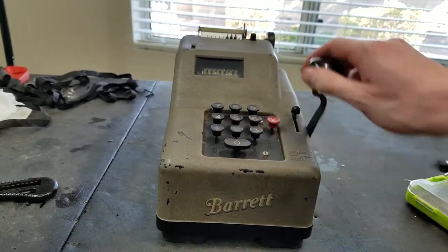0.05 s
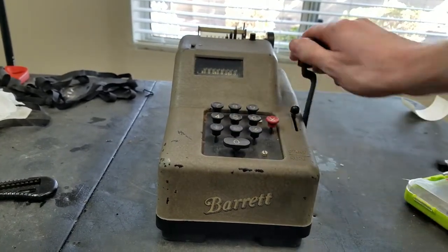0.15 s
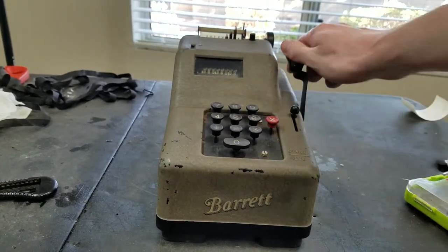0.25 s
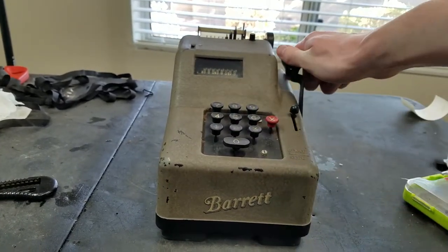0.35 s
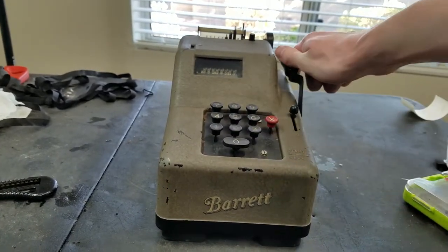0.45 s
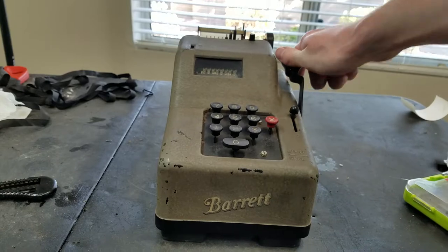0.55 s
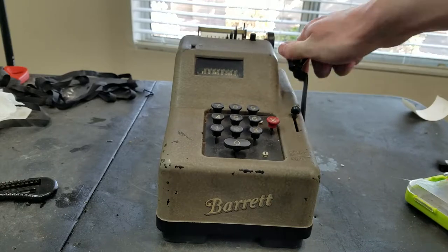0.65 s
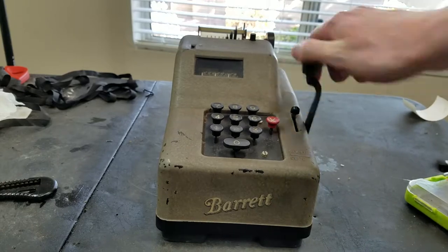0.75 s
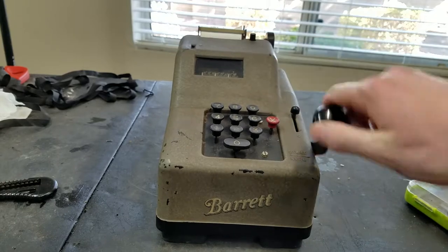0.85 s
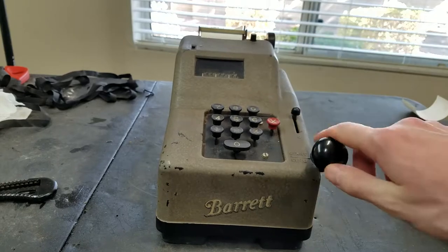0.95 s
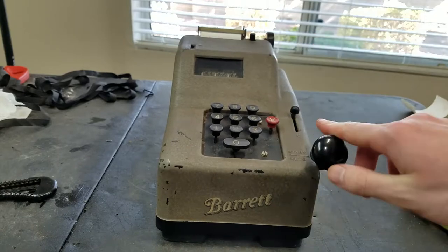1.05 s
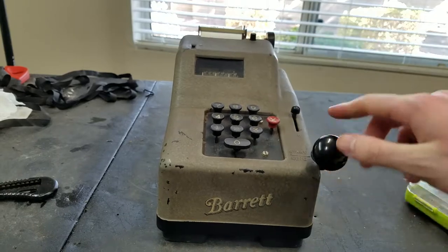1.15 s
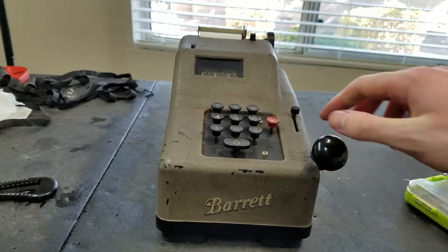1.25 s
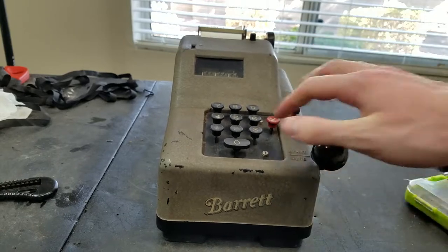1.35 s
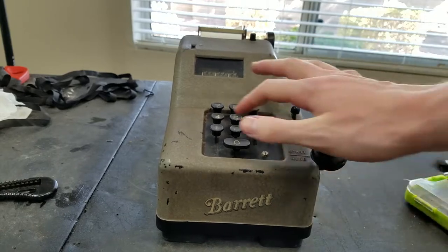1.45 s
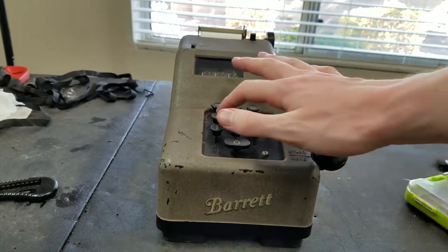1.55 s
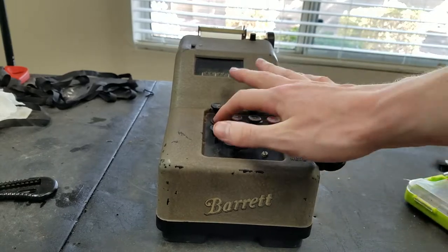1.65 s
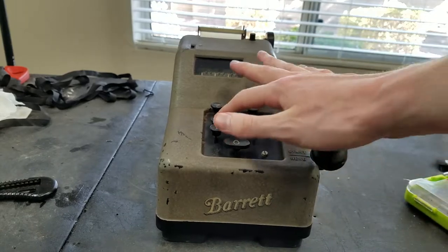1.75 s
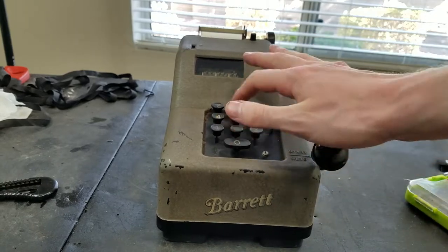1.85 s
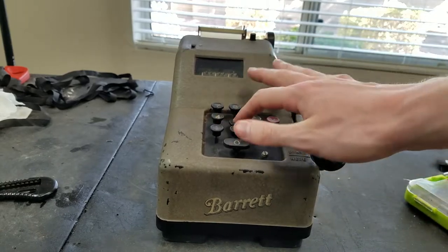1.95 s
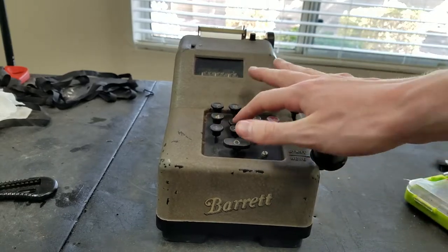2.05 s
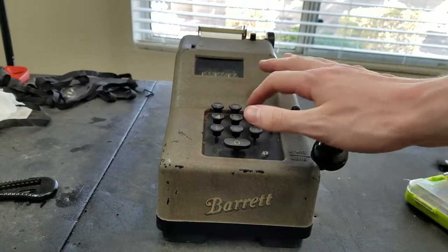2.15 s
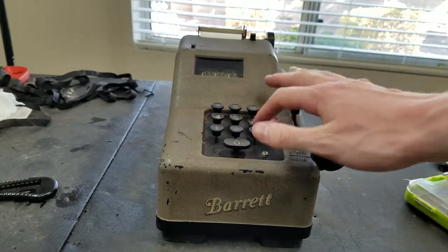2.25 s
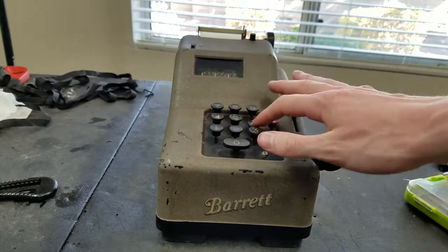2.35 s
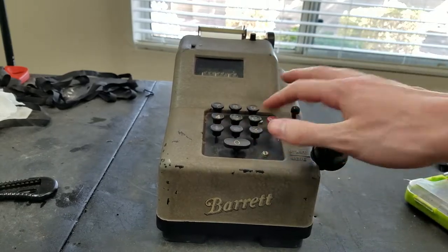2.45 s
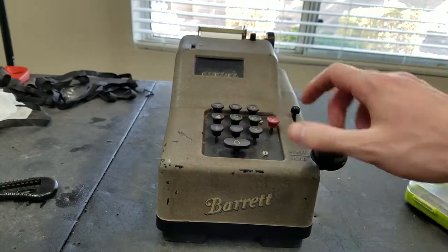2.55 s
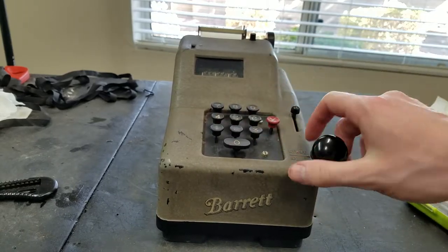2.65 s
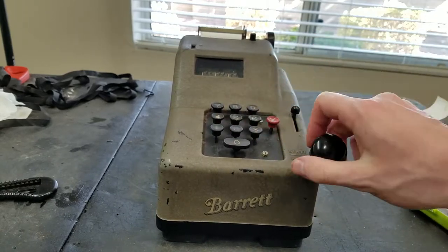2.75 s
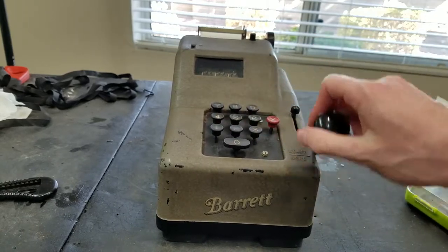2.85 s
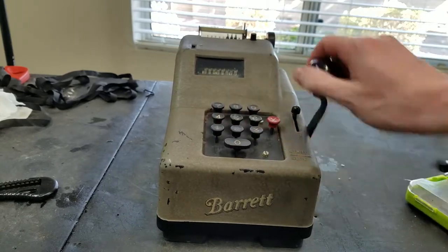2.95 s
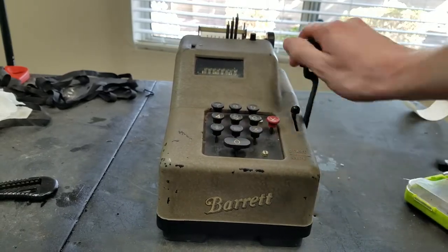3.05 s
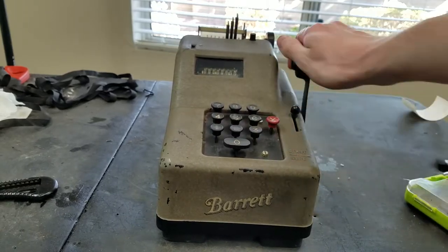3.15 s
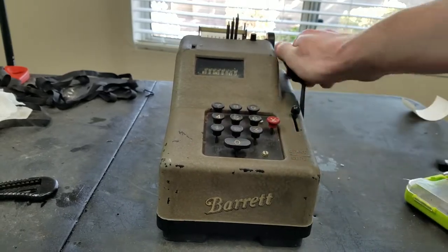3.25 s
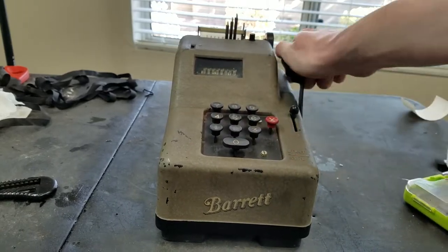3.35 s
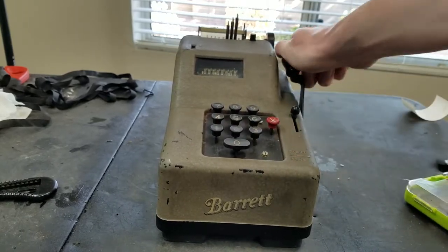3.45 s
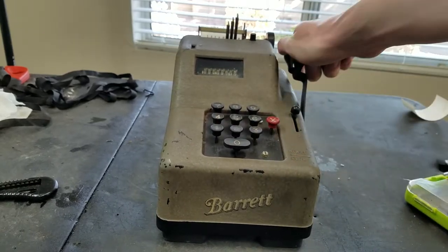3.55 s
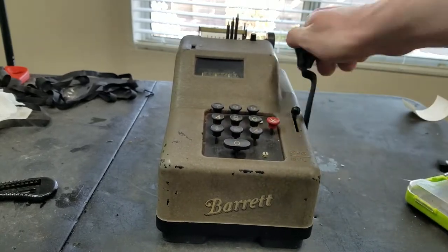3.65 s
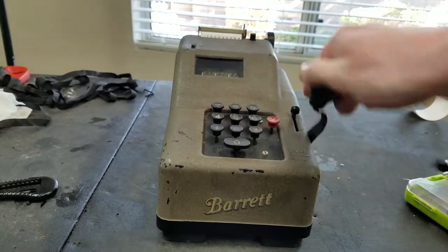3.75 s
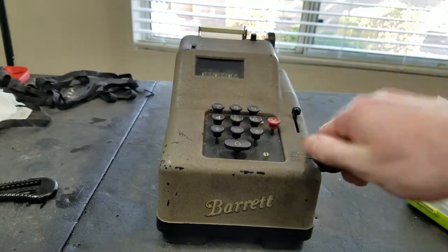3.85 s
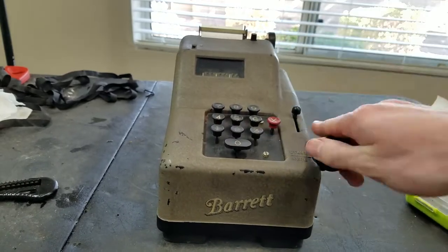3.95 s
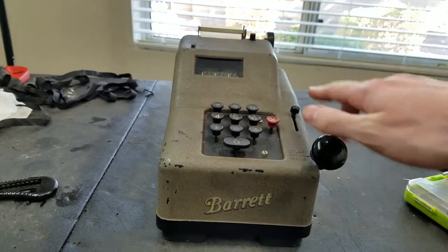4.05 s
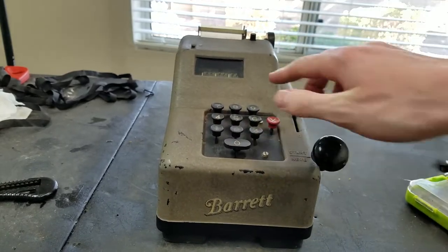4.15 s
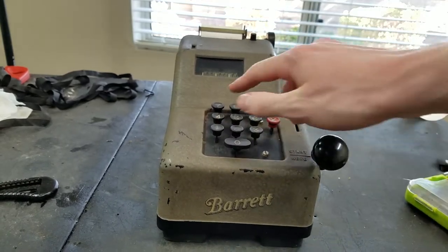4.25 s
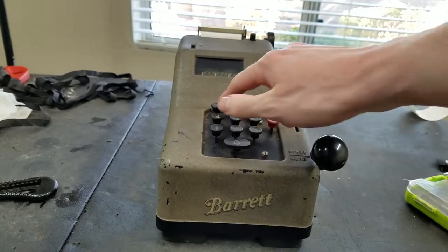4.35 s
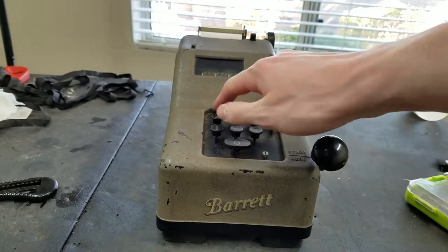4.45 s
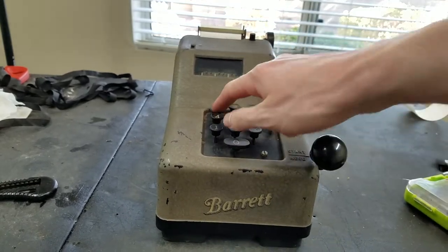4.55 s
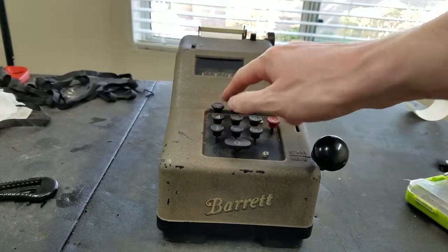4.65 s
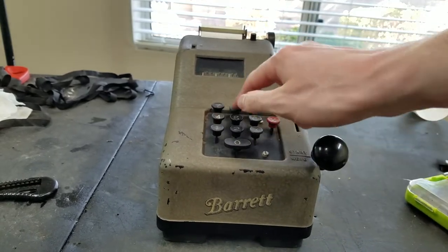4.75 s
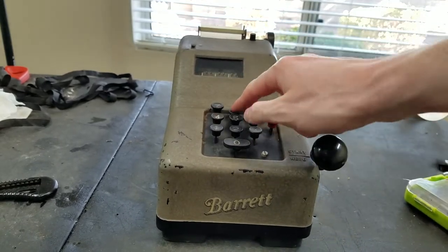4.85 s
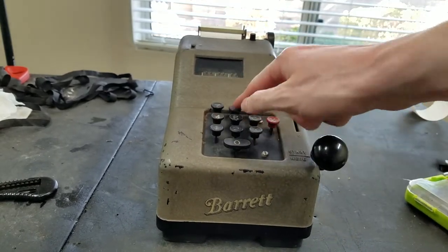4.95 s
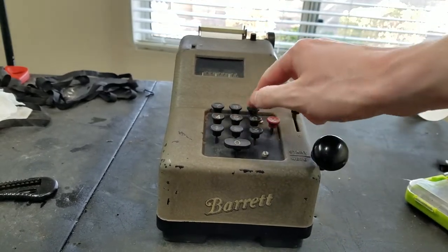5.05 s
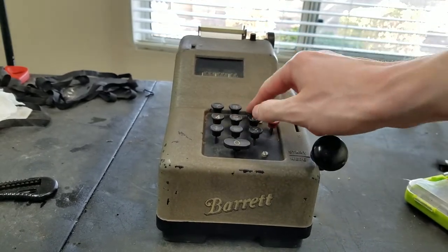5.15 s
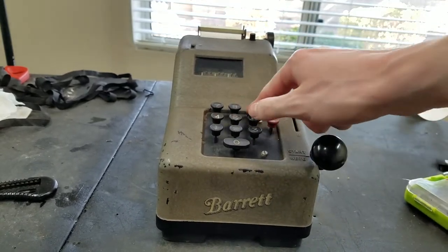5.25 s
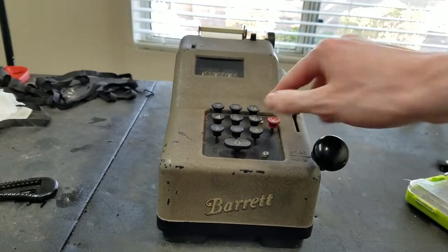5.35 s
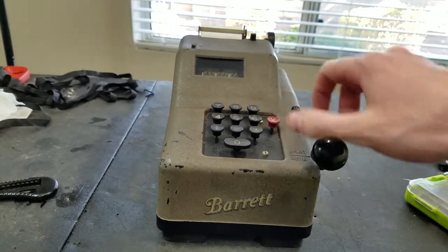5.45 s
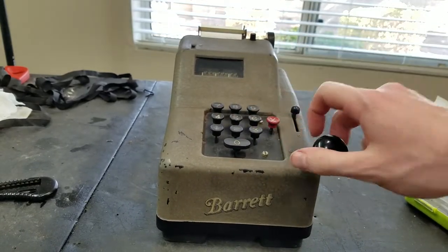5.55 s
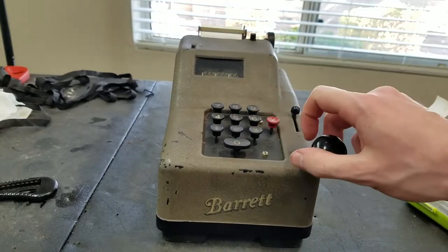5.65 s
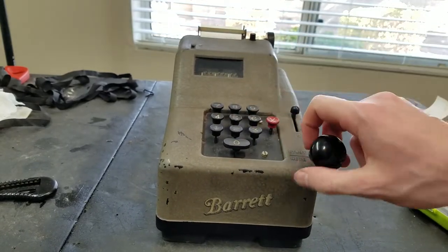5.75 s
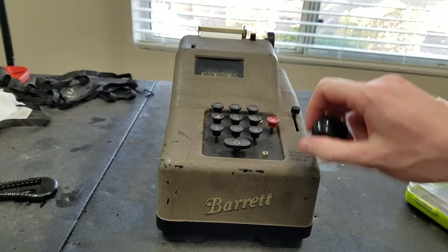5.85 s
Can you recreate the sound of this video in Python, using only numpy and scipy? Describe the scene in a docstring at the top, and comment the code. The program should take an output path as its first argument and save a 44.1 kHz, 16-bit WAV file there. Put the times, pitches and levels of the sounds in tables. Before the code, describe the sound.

A mechanical adding machine, heard close in stereo in a small, ringing room with faint low air noise. It opens at once with a crank pull, a dense bright rattle of gear teeth over juddering racks, a ratchet slowing slightly, until 0.35 s. After a short gap, a pawl snaps at 0.72 and the crank returns with swelling clatter, slamming home at 0.96 with a low, beating metallic boom. A finger touches the keys; three clack down near 1.7, 2.0 and 2.3, each springing up about 0.15 s later with a snap, carriage clunk and small rebound. Fingers knock the hollow knob at 2.8. The second pull grinds from 2.9 to 3.3; the return catches at 3.65 and slams at 3.92. Three more keys follow near 4.5, 4.85 and 5.2, the last release at 5.4. Dull knob thumps and taps cluster from 5.65 to 5.85, ending with a small catch at 5.9.

```python
"""A crank is pulled with a rattle of racks and gears, pawls catch, and the works slam home: an adding machine.
Twice it is pulled and let back; after each return a finger presses three keys and then knocks the crank knob.
Contacts are filtered noise bursts, short sine modes and impulses; case, knob and crank arm are resonators.
Gear noise is clatter of random contacts shaped by the crank's movements, with a ratchet ticking on the pulls.
A metal housing filters the keys and works, a ringing room adds its tail, and steady air noise lies below."""
import sys
import numpy as np
from scipy import signal
from scipy.fft import rfft, irfft, next_fast_len
from scipy.io import wavfile
from scipy.ndimage import uniform_filter1d

SR = 44100
rng = np.random.default_rng(int(sys.argv[2]) if len(sys.argv) > 2 else 0)


def transcribe(signal):
    """Save signal, clipped to [-1, 1], as a 16-bit WAV file at the path in sys.argv[1]."""
    frames = np.atleast_2d(signal).T
    limited = np.clip(frames, -1, 1)
    pcm = np.round(limited * 32767).astype(np.int16)
    wavfile.write(sys.argv[1], SR, pcm)


N = 260631
TIME = np.arange(N) / SR   # [s]

# the crank is pulled forward: (start [s], end [s], time to pick up speed [s])
PULLS = [(0.003, 0.354, 0.035), (2.877, 3.272, 0.079)]
# the spring takes the crank back: (pawl flips [s], crank slams home [s], relative slam level [dB])
RETURNS = [(0.7195, 0.9642, -27.5), (3.6491, 3.9199, -27)]
# a fingertip lands on a key top or shifts on it:
# (time [s], sharpness [dB], weight [dB], fingernail tick level [dB])
TOUCHES = [(1.643, -8, 10, -42), (1.967, 8, 1, -62), (2.278, 12.5, -7, -66), (2.2904, 1, -10, -51),
           (4.4315, -3, 6.5, -58), (4.463, -3, 4, -58), (4.6366, 3, 7, -49), (4.8142, 4, -10, -47),
           (5.145, 8, -8, -54), (5.296, 5, -21, -56)]
# spectrum of a steel tick: (frequency [Hz], relative density [dB per Hz])
STEEL_COLOUR = [(600, -40.5), (1500, 6.5), (2400, 4.5), (3600, 0.5), (6000, -8), (8000, -1), (10000, -3.5),
                (15500, -1.5)]
# spectrum of a lever clack: (frequency [Hz], relative density [dB per Hz])
LEVER_COLOUR = [(250, -22.5), (550, -0.5), (780, -3), (1000, 2), (1270, -5.5), (1520, -7.5), (2200, -9.5),
                (3200, -17), (5000, -16), (9000, -37)]
# spectrum of rattling gear teeth: (frequency [Hz], relative density [dB per Hz])
TEETH_COLOUR = [(500, -2.5), (1400, -17), (2600, -4), (4200, 1.5), (6200, -1), (7200, -1), (8400, 2.5),
                (9600, -2.5), (15500, -0.5)]
# stereo width of the sound at the microphones: (frequency [Hz], side relative to mid [dB])
STEREO_WIDTH = [(100, -20), (250, -21.5), (500, -8), (1000, -2.5), (4000, 0.5), (12000, 1.5)]


def catches(snap_db=-11, tick_db=-1, clack_db=-1.0, ping_db=-6, thud_db=-5, ring_db=-44.0,
            tick_t60=0.056, clack_t60=.05, thud_t60=0.08):
    """Impact excitation: heavier parts of the works hit their stops and shake the whole frame."""
    # spectrum of a case thud: (frequency [Hz], relative density [dB per Hz])
    thud_colour = [(55, -41.5), (85, -17), (140, -7), (235, 0), (380, 1.5), (520, -5), (750, -10),
                   (1000, -4), (1300, -40), (2500, -30)]
    s, tick, clack, thud = crank_contacts().T
    tick_blows = impulses(s, tick + snap_db) + blows(s, tick + tick_db, tick_t60)
    steel = colour(tick_blows, STEEL_COLOUR)
    lever = colour(blows(s, clack + clack_db, clack_t60), LEVER_COLOUR)
    lever_modes = pings(s, clack + ping_db, low_hz=474, high_hz=2036, t60=0.073, count=7)
    body = colour(blows(s, thud + thud_db, thud_t60), thud_colour)
    return steel + lever + lever_modes + body + case(s, thud + ring_db)


def crank_contacts():
    """A mechanism repeats its impact sequence: each return shares one, besides the separate catches."""
    # pawls and racks catch where the digits set them, mostly during a stroke:
    # (time [s], relative steel tick [dB], lever clack [dB], case thud [dB])
    digit_catches = [(0.0252, -34, -37.5, -58), (0.0806, -46, -29, -38), (0.0965, -47, -35.5, -27.5),
                     (0.109, -49, -33.5, -30), (0.128, -51, -44, -41), (0.147, -54, -48, -33),
                     (0.1835, -55, -36.5, -32), (0.211, -42, -43, -49), (0.228, -54, -55, -49),
                     (0.3274, -37, -43, -38), (0.417, -37.5, -36, -32.5), (0.607, -58, -47.5, -52),
                     (0.835, -42, -27.5, -31), (0.864, -35, -32, -24), (0.906, -37, -28, -33),
                     (2.8902, -51, -51, -29), (2.9492, -52, -36, -32), (2.9804, -48, -28.5, -28),
                     (3.055, -56, -34, -27.5), (3.07, -52, -39.5, -35.5), (3.088, -52, -37, -28.5),
                     (3.2471, -37.5, -42, -37.5), (3.485, -66, -46.5, -44), (3.745, -56, -48, -24.5),
                     (3.762, -37, -33.5, -23.5), (3.817, -52, -32, -34), (3.862, -34, -33, -35),
                     (3.883, -41, -30.5, -20), (3.901, -36, -35.5, -25.5), (5.9014, -43, -72, -30.5)]
    # contacts as each return begins:
    # (time after the pawl flips [s], relative steel tick [dB], lever clack [dB], case thud [dB])
    flip_contacts = [(-.048, -59, -49.5, -44), (0, -23.5, -31.5, -25), (.0095, -45, -38, -38),
                     (.0465, -39.5, -34, -26), (.053, -25.5, -36.5, -25.5)]
    # contacts as each return ends:
    # (time after the slam [s], relative steel tick [dB], lever clack [dB], case thud [dB])
    home_contacts = [(-.0285, -27, -39.5, -34), (-.017, -33, -26, -39), (-.0045, -37.5, -20, -26),
                     (0, -32, -25, -19.5), (.0108, -38, -29, -29)]
    rows = [digit_catches]
    for flip, slam, _ in RETURNS:
        rows.append(np.add(flip_contacts, [flip, 0, 0, 0]))
        rows.append(np.add(home_contacts, [slam, 0, 0, 0]))
    return np.vstack(rows)


def gears(link_db=-8, lever_db=-8.5, rattle_db=-1, rumble_db=-7.5):
    """Motion-driven random impacts: teeth rattle, links clink, levers knock, racks judder in their guides."""
    # spectrum of juddering racks: (frequency [Hz], relative density [dB per Hz])
    rack_colour = [(55, -19), (85, -3), (130, -12.5), (200, 0), (270, -3.5), (340, 1.5), (430, -0.5),
                   (600, -6), (780, -2.5), (1030, -0.5), (1280, -16.5), (2200, -10.5), (5000, -32)]
    stop_s = 0.012   # the rattle dies once the crank stops
    rattle, rumble = np.zeros(N), np.zeros(N)
    for start, end, attack_s in PULLS:
        # the hand slows against the spring, so the levels sag
        rattle += stroke(start, end, attack_s, stop_s, db=-32, db_per_s=-21)
        rumble += stroke(start, end, attack_s=0.054, release_s=1, db=-26, db_per_s=-55)
    for flip, slam, _ in RETURNS:
        start = flip - 0.044   # the crank starts to move before the pawl flips
        attack_s = 0.05
        rattle += stroke(start, slam, attack_s, stop_s, db=-31.5)
        # the type bars rattle back down just before the slam
        rattle += stroke(slam - 0.059, slam, 0.0067, stop_s, db=-36)
        # the racks gather speed
        rumble += stroke(start, slam, attack_s, stop_s, db=-35.5, db_per_s=44.5)
    teeth = colour(rattle * clatter(per_s=380, spread_db=11, t60=.015, count=20), TEETH_COLOUR)
    lever_gain = np.sqrt(rumble * rattle)
    levers = colour(lever_gain * clatter(per_s=190, spread_db=14, t60=0.035, count=10), LEVER_COLOUR)
    links = colour(rattle * clatter(per_s=200, spread_db=9, t60=.03, count=6), STEEL_COLOUR)
    racks = colour(rumble * clatter(per_s=170, spread_db=7, t60=0.055, count=30), rack_colour)
    dry_gears = from_db(rattle_db) * teeth + from_db(link_db) * links
    dry_gears += from_db(lever_db) * levers + from_db(rumble_db) * racks
    return ratchet(rattle) + dry_gears


def stroke(start, end, attack_s, release_s, db, db_per_s=0):
    """Amplitude envelope of one movement: it picks up, holds on a steady slope [dB/s] and dies away."""
    attack = np.clip((TIME - start) / max(attack_s, .002), 0, 1)
    slope_db = db_per_s * np.clip(TIME - start, 0, end - start)
    release_db = -60 * np.maximum(TIME - end, 0) / max(release_s, .005)
    return attack * from_db(db + slope_db + np.maximum(release_db, -150))


def clatter(per_s, spread_db, t60, count=6):
    """Random impact process: contacts of uneven size, dealt among several small parts; rms one."""
    out = np.zeros((2, N))
    parts = [burst(t60) for part in range(count)]
    draws = rng.random((int(per_s * N / SR), 3))
    for k, (when, size, sign) in enumerate(draws):
        gain = np.sign(sign - .5) * from_db(abs(spread_db) * size ** 2)
        add(out, when * N / SR, gain * parts[k % count])
    return unit(out) * np.sqrt(N)


def ratchet(rattle):
    """Tooth rate follows shaft speed: a pawl ticks ever slower as a pull meets the spring."""
    # teeth passing the pawl: (rate at the start of a pull [1/s], rate at its end [1/s])
    teeth_per_s = (81, 55)
    tooth_db, spread_db = -7.5, 3.5      # re the rattle; standard deviation
    jitter_s, tooth_t60 = .002, .016
    rate = np.zeros(N)
    for start, end, _ in PULLS:
        rate += np.interp(TIME, [start, end], teeth_per_s, left=0, right=0)
    # a tick wherever the integrated rate passes a whole tooth
    at = np.flatnonzero(np.diff(np.floor(np.cumsum(rate) / SR)))
    shift, size = rng.standard_normal((len(at), 2)).T
    levels_db = 20 * np.log10(rattle[at] + 1e-9) + tooth_db + spread_db * size
    return colour(blows(TIME[at] + jitter_s * shift, levels_db, tooth_t60), TEETH_COLOUR)


def arm(ring_db=-23.5):
    """Beating of close modes: the crank arm booms after it hits the rest, swelling and throbbing."""
    # modes of the crank arm and its spring: (frequency [Hz], relative level [dB], t60 [s])
    arm_modes = [(188, -8, .5), (232, -2.5, .38), (269, -5, .36), (316, -1, .28), (343.5, 3.6, .62),
                 (354.3, 2.6, .62), (485, -9.5, .5), (646, -14, .4), (752, -16, .35), (942, -14, .35),
                 (1078, -11, .6)]
    _, s, db = np.transpose(RETURNS)
    return modes(arm_modes, s, db + ring_db, spread_db=0.0)


def keys(clack_db=-3, ping_db=-6.5, thud_db=-8, ring_db=-46, slide_db=-11, clack_t60=0.04,
         thud_t60=0.088, bench_db=-10, bench_t60=0.11):
    """Friction, then impact: a stem slides, snaps and bounces once; lever, carriage, case, bench answer."""
    # spectrum of a hard snap: (frequency [Hz], relative density [dB per Hz])
    snap_colour = [(800, -21), (1800, 13.5), (3000, 2.5), (4400, 8), (7000, 1.5), (10000, -4), (13000, 2.5),
                   (15500, -6.5)]
    # spectrum of the carriage clunk: (frequency [Hz], relative density [dB per Hz])
    clunk_colour = [(100, -35), (250, -7.5), (380, 5), (520, 1), (750, -10), (1000, -6), (1300, -27),
                    (2500, -43)]
    # spectrum of the bench top: (frequency [Hz], relative density [dB per Hz])
    bench_colour = [(55, -20), (85, -20), (140, 0), (200, -1), (350, -3.5), (600, -2), (1500, -49)]
    s, tick, clack, thud, t60 = keystrokes().T
    # the snap is harder where the contact is shorter than the reference of .021 s
    snap_level = tick - 5 - 10 * np.log10(np.maximum(t60, .008) / .021)
    snap = colour(impulses(s, snap_level) + blows(s, snap_level, .006), snap_colour)
    bounce_times = s + .005 * rng.uniform(.5, 2.4, len(s))
    bounce = blows(bounce_times, tick - 10.5, t60)
    stem = blows(s, tick - 3, t60)
    steel = colour(slides(s, tick + slide_db) + bounce + stem, STEEL_COLOUR)
    lever = colour(blows(s, clack + clack_db, clack_t60), LEVER_COLOUR)
    lever_modes = pings(s, clack + ping_db, low_hz=881.5, high_hz=2619, t60=.075, count=6)
    carriage_modes = pings(s, thud - 9, low_hz=370, high_hz=1200, t60=.06, count=7)
    body = colour(blows(s, thud + thud_db, thud_t60), clunk_colour)
    # the bench top takes a moment (0.012 s) to move
    bench = colour(blows(s + 0.012, thud + bench_db, bench_t60), bench_colour)
    contacts = snap + steel + lever + lever_modes + chatter(s, clack)
    return contacts + carriage_modes + body + bench + case(s, thud + ring_db)


def keystrokes():
    """Latch and spring: a touched key latches, slips free, rubs, snaps up; the carriage lands and rebounds."""
    # a key is pushed down to its latch: (time [s], sharpness [dB], weight [dB])
    presses = [(1.681, 6.5, 1), (1.9991, 2.5, 0.5), (2.3244, 0.5, 2.5), (4.523, 1, 1.5), (4.8471, 1.5, -2),
               (5.1776, -6.5, 1)]
    # a key springs back up and the pin carriage steps on:
    # (time [s], sharpness [dB], weight [dB], slips free earlier by [s], carriage travel [s])
    releases = [(1.8408, -1.5, -2.5, 0.025, 0.022), (2.1525, -7, -1.5, 0.023, 0.022),
                (2.478, 5.5, -1.5, .018, 0.029), (4.688, -6, -2, .022, 0.02),
                (5.028, -1.5, -3, 0.032, .0133), (5.3747, 2.5, -2, 0.026, 0.018)]
    # contacts of a keystroke, each: (relative steel tick [dB], lever clack [dB], case thud [dB], tick t60 [s])
    # a t60 below the floors used for snaps and bursts gives the shortest sound
    touch = (-51, -58.5, -53, 0.1018)
    latch = (-37, -36.5, -37.5, 0.055)
    unlatch = (-50, -43, -39.5, -0.9)
    rub = (-45, -39.5, -61, 0.9)
    spring_up = (-32.5, -36, -44.5, 0.0183)
    carriage = (-46, -35, -29, -2.8)
    rebound = (-58, -37, -32.5, .02)
    s, sharp, weight, _ = np.transpose(TOUCHES)
    down = [contact(touch, s, sharp, weight), contact(latch, *np.transpose(presses))]
    s, sharp, weight, lead, travel = np.transpose(releases)
    landing = s + travel
    up = [contact(unlatch, s - lead, 0, weight),
          contact(rub, s - lead / 2, sharp, weight),
          contact(spring_up, s, sharp, weight),
          contact(carriage, landing, weight, weight),
          contact(rebound, landing + 0.042, weight, weight)]   # seconds after the carriage lands
    return np.vstack(down + up)


def contact(kind, times, sharp_db, weight_db):
    """Sharpness scales the tick, weight the clack and thud; rows of (time, tick, clack, thud, t60)."""
    tick, clack, thud, t60 = kind
    columns = np.broadcast_arrays(times, tick + sharp_db, clack + weight_db, thud + weight_db, t60)
    return np.column_stack(columns)


def slides(times, levels_db, length_s=0.014):
    """Sliding friction: a stem scrapes along its guide, louder and louder, just before it snaps."""
    track, t = np.zeros((2, N)), TIME[:int(length_s * SR)]
    for s, db in zip(times, levels_db):
        add(track, s - length_s, from_db(db) * stereo_noise(len(t)) * t / length_s)
    return track


def chatter(times, levels_db, count=5):
    """Lossy repeated impact: the loose linkage bounces at uneven gaps, on average weaker each time."""
    # spectrum of the loose key linkage: (frequency [Hz], relative density [dB per Hz])
    linkage_colour = [(350, -11), (600, 3), (950, 5), (1200, -3), (1500, 2.5), (2200, -4), (3200, -6.5),
                      (4500, -6.5), (5300, -18), (6100, -11.5), (12000, -24.5)]
    chatter_db, loss_db = -7, 2.6        # re the contact; scale of the loss per bounce
    gap_s, bounce_t60 = .0052, .018
    gaps, sizes = rng.random((len(times), 2, count)).transpose(1, 0, 2)
    s = times[:, None] + np.cumsum(gap_s * (.5 + gaps), axis=1)
    db = levels_db[:, None] + chatter_db - loss_db * (np.arange(count) + 2 * sizes - 1)
    return colour(blows(s.ravel(), db.ravel(), bounce_t60), linkage_colour)


def nails(t60=0.012):
    """A light, hard impact radiates mostly treble: a fingernail ticks thinly on the key top."""
    # spectrum of a fingernail tick: (frequency [Hz], relative density [dB per Hz])
    nail_colour = [(3000, -19), (8000, -12), (13000, 3), (15500, -4)]
    s, _, _, db = np.transpose(TOUCHES)
    return colour(blows(s, db, t60), nail_colour)


def knob(thump_db=0.0, shell_db=-26.0, tink_db=-0.5, thump_t60=0.083, tink_t60=0.03):
    """Shell modes: soft fingers make the hollow knob ring, thump on its shaft, and tink at its pin."""
    # fingers knocking the loose knob:
    # (time [s], relative hollow ring [dB], shaft thump [dB], pin tink [dB])
    knocks = [(2.792, -35, -41, -57), (2.838, -50, -48, -66), (5.655, -37.5, -51, -87),
              (5.758, -40.5, -35.5, -48), (5.805, -37, -35, -60), (5.847, -36.5, -35, -45.5)]
    # modes of the hollow knob: (frequency [Hz], relative level [dB], t60 [s])
    shell_modes = [(230, -20, 0.23), (397, -11, .08), (507, -3.5, 0.18), (580, -6.5, 0.056),
                   (882, -6.5, 0.073), (1340, -18, 0.046), (1670, -20, .04)]
    # spectrum of the shaft thump: (frequency [Hz], relative density [dB per Hz])
    shaft_colour = [(90, -17), (215, -1.5), (330, -5), (520, -2), (750, -16), (1400, -20), (3000, -29),
                    (6000, -44), (12000, -65)]
    # spectrum of the pin tink: (frequency [Hz], relative density [dB per Hz])
    pin_colour = [(3000, -12), (7500, -20), (9500, 3), (11000, -6), (15000, -22)]
    s, ring, thump, tink = np.transpose(knocks)
    shell = modes(shell_modes, s, ring + shell_db, spread_db=0.5)
    shaft = colour(blows(s, thump + thump_db, thump_t60), shaft_colour)
    pin = colour(blows(s, tink + tink_db, tink_t60), pin_colour)
    return shell + shaft + pin


def case(times, levels_db):
    """Modal response: the case and frame ring after each blow."""
    # modes of the case and frame: (frequency [Hz], relative level [dB], t60 [s])
    case_modes = [(86, -26, .5), (127, -16, .5), (159, -11, .4), (189, -9, .45), (231, -10, .35),
                  (272, -12, .35), (347, -9, .35), (428, -13, .25), (489, -10, .3), (533, -10, .2),
                  (620, -5, .14), (745, -7, .14), (852, -10, .16), (965, -7, .14), (1098, -9, .18),
                  (1485, -14, .12), (1620, -15, .12), (1905, -15, .12)]
    return modes(case_modes, times, levels_db, spread_db=3)


def housing(x):
    """Resonant transmission: the metal shell favours some pitches and swallows others."""
    # resonances of the housing: (frequency [Hz], width [Hz], gain [dB])
    resonances = [(129, 14, 6), (137.5, 14, -3.5), (159, 11, 4), (174.6, 19, -2), (183, 21, 7),
                  (209.7, 8.8, -5.5), (236, 7.1, 7), (280, 6.2, 2), (298, 19, -7.5), (349, 9.7, 3.5),
                  (374, 17, -2), (493, 17, 3), (626, 20, 1.5), (798, 49, -1.5), (943, 41, 1.5),
                  (1010, 50, -2.5), (1056, 12, -1.5), (1220, 300, -2.5), (1433, 77, 2), (1730, 130, -3),
                  (1900, 38, 1), (2530, 43, 1), (2850, 68, 3), (4510, 120, 0), (5060, 570, -2)]
    response = signal.unit_impulse(SR // 2)
    for hz, width, db in resonances:
        b, a = signal.iirpeak(hz, hz / max(width, 3), fs=SR)
        response = response + (from_db(db) - 1) * signal.lfilter(b, a, response + 1e-18)
    return through(x, response)


def room(x, build_s=0.0066):
    """Diffuse reverberation: a tail builds up after the direct sound and dies at its own rate in each band."""
    # decay of the room: (frequency [Hz], decay rate [dB/s])
    decay_rate = [(100, 107), (300, 93.5), (1000, 59.5), (3000, 81.5), (8000, 97), (15000, 169)]
    # strength of the reverberation: (frequency [Hz], relative level [dB])
    tail_level = [(100, -3.5), (300, 3), (1000, -3.5), (3000, -3), (8000, -2.5), (15000, -6.5)]
    t = TIME[:int(1.2 * SR)]
    noise = even_noise(from_db(-t * at_hz(decay_rate, 500)))
    hz = np.fft.rfftfreq(len(t), 1 / SR)
    build_up = 1 - np.exp(-(t / build_s) ** 2)
    centres = np.geomspace(80, 16000, 9)   # band centres [Hz]
    tail = 0
    for centre, share in zip(centres, np.eye(len(centres))):
        # triangular bands that overlap and sum to one
        band = irfft(noise * at_hz(np.c_[centres, share], hz), len(t))
        envelope = unit(from_db(-t * at_hz(decay_rate, centre)) * build_up)
        tail = tail + band * envelope * from_db(at_hz(tail_level, centre))
    return through(x, tail)


def even_noise(fade):
    """Spectral whitening: spectrum of stereo noise that favours no pitch when it dies with the given fade."""
    noise = stereo_noise(len(fade))
    power = uniform_filter1d(np.mean(np.abs(rfft(noise * fade)) ** 2, axis=0), size=30)
    return rfft(noise) * np.sqrt(power.mean() / power)


def air(level_db=-48.5):
    """Stationary coloured noise: the steady background of the room."""
    # spectrum of the background: (frequency [Hz], relative density [dB per Hz])
    air_colour = [(25, -8.5), (45, -24), (80, -4.5), (125, -1), (230, -1), (350, -4), (550, -12),
                  (900, -11.5), (1500, -20), (3000, -30.5), (6000, -38.5), (11000, -40), (15500, -33)]
    return from_db(level_db) * colour(stereo_noise(N), air_colour)


def lean(x):
    """Interchannel level difference: each band is shared between the two microphones."""
    # how much more each band reaches the left microphone: (frequency [Hz], level difference [dB])
    left_excess = [(60, 1.5), (250, -3), (500, -2.5), (1100, -2.5), (4000, -3.5), (7300, -7.5), (9500, 2),
                   (12000, 2.5), (15000, -2.5)]
    size = next_fast_len(N + SR // 10)
    half_db = at_hz(left_excess, np.fft.rfftfreq(size, 1 / SR)) / 2
    return irfft(rfft(x, size) * from_db([half_db, -half_db]), size)[:, :N]


def modes(table, times, levels_db, spread_db):
    """Modal superposition: a blow rings all modes at random strengths; neighbours swing oppositely."""
    out = np.zeros((2, N))
    for k, (hz, db, t60) in enumerate(table):
        radius = from_db(-60 / (max(t60, .02) * SR))
        angle = 2 * np.pi * hz / SR
        force = impulses(times, levels_db + spread_db * rng.standard_normal(len(times)))
        poles = [1, -2 * radius * np.cos(angle), radius * radius]
        ring = signal.lfilter([.5, 0, -.5], poles, force + 1e-18)
        mode = (-1) ** k * from_db(db) * ring
        # higher modes radiate more unevenly to the two sides
        side = .5 * (-1) ** k * from_db(at_hz(STEREO_WIDTH, hz))
        out += mode * (1 + side * np.array([[1], [-1]]))
    return out


def pings(times, levels_db, low_hz, high_hz, t60=0.1, count=4):
    """Damped sine modes: each struck part has a few short ones at random pitches of its own."""
    track, t = np.zeros((2, N)), TIME[:SR // 8]
    draws = rng.random((len(times), 2, count, 1))
    for s, db, (pitch, side) in zip(times, levels_db, draws):
        hz = low_hz * (high_hz / low_hz) ** pitch
        tones = np.sin(2 * np.pi * hz * t) * from_db(-60 * t / t60)
        ping = np.array([np.sum(tones * side, axis=0), np.sum(tones * (1 - side), axis=0)])
        add(track, s, from_db(db) * np.sqrt(SR / 50) * unit(ping))
    return track


def blows(times, levels_db, t60):
    """Impact train: one burst for each contact, its level taken as rms over a fiftieth of a second."""
    track = np.zeros((2, N))
    for s, db, ring in zip(times, levels_db, np.broadcast_to(t60, len(times))):
        add(track, s, from_db(db) * np.sqrt(SR / 50) * burst(max(ring, .003)))
    return track


def impulses(times, levels_db):
    """Ideal impacts: one bare impulse for each contact, on the same level scale as the bursts."""
    track = np.zeros(N)
    at = np.clip(np.asarray(times) * SR, 0, N - 1).astype(int)
    track[at] = from_db(levels_db) * np.sqrt(SR / 50)
    return track


def burst(t60):
    """High modal density: a small struck part's quickly dying modes act as decaying noise; energy one."""
    t = TIME[:int(t60 * SR) + 64]
    return unit(stereo_noise(len(t)) * from_db(-60 * t / t60))


def stereo_noise(n):
    """Spatial coherence: white noise, alike in both channels in the bass and unrelated in the treble."""
    size = next_fast_len(n)
    mid, side = rfft(rng.standard_normal((2, size)))
    width = from_db(at_hz(STEREO_WIDTH, np.arange(len(mid)) * SR / size))
    return irfft((mid + side * width * [[1], [-1]]) / np.sqrt(1 + width ** 2), size)[:, :n]


def colour(x, spectrum, size=4096):
    """Causal (minimum-phase) filtering to the given spectrum; white noise keeps its power."""
    gain = from_db(at_hz(spectrum, np.arange(size // 2 + 1) * SR / size))
    cepstrum = irfft(np.log(gain))
    # folding the cepstrum onto positive times makes the phase minimal
    cepstrum[1:size // 2] *= 2
    cepstrum[size // 2 + 1:] = 0
    return through(x, unit(irfft(np.exp(rfft(cepstrum)))))


def through(x, response):
    """Linear system: convolve with an impulse response."""
    return signal.oaconvolve(np.atleast_2d(x), np.atleast_2d(response), axes=-1)[:, :N]


def add(track, s, sound):
    """Superposition: mix a sound in at a time [s]."""
    start = int(np.clip(s * SR, 0, N - 1))
    track[..., start:start + sound.shape[-1]] += sound[..., :N - start]


def unit(x):
    """Energy normalization: scale to an energy of one per channel."""
    return x / np.sqrt(np.sum(x ** 2, axis=-1, keepdims=True))


def at_hz(points, hz):
    """Logarithmic pitch scale: read a table on a log-frequency axis."""
    f, value = np.transpose(points)
    return np.interp(np.log(np.maximum(hz, 1)), np.log(f), value)


def from_db(db):
    """Logarithmic level scale: decibels to amplitude gain."""
    return 10 ** (np.asarray(db) / 20)


def scene(keys_wet_db=-2.73, arm_wet_db=-19, knob_wet_db=-4):
    """Superposition of direct and reverberant sound: the machine close by, the room and its air around it."""
    works = housing(catches() + gears())
    shudder = arm()
    fingers = housing(keys()) + nails()
    handle = knob()
    to_room = from_db(keys_wet_db) * fingers + works
    to_room = to_room + from_db(knob_wet_db) * handle + from_db(arm_wet_db) * shudder
    machine = fingers + works + handle + shudder + room(to_room)
    # the machine's sound holds no deep bass
    bass_cut = signal.butter(4, 69, "high", fs=SR, output="sos")   # cutoff in Hz
    return lean(signal.sosfilt(bass_cut, machine) + air())


def record(dry):
    """Low-pass filtering: the top of the treble is cut steeply above 15900 Hz."""
    return signal.sosfilt(signal.ellip(10, .2, 80, 15900, fs=SR, output="sos"), dry)


dry = scene()
out = record(dry)
transcribe(out)
```